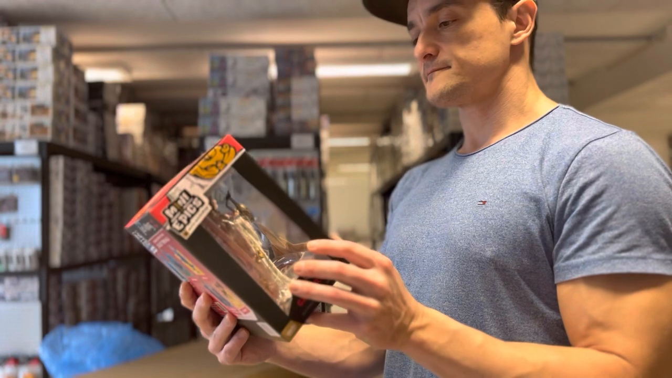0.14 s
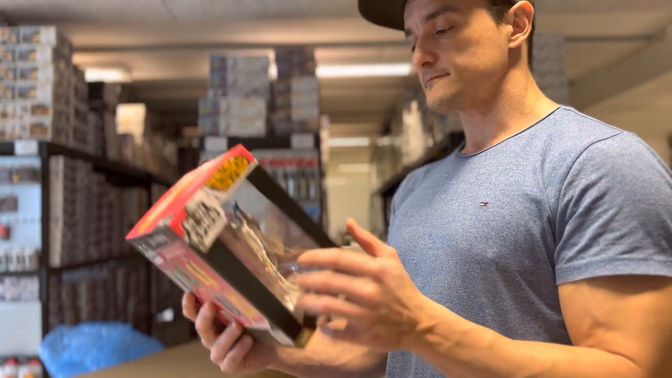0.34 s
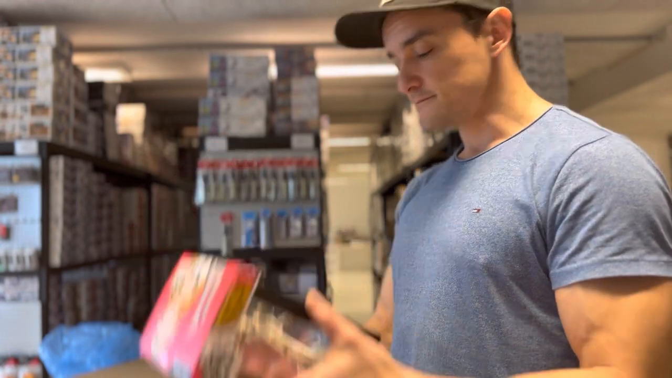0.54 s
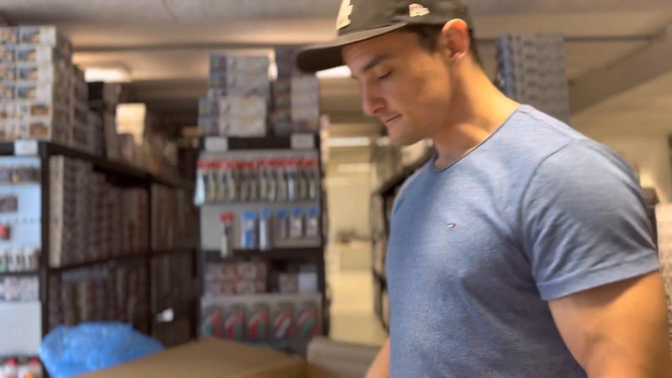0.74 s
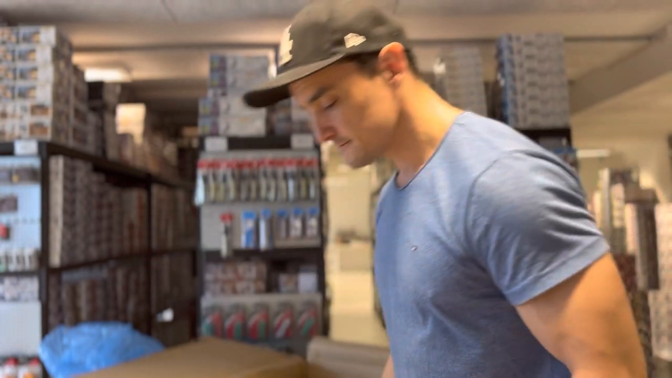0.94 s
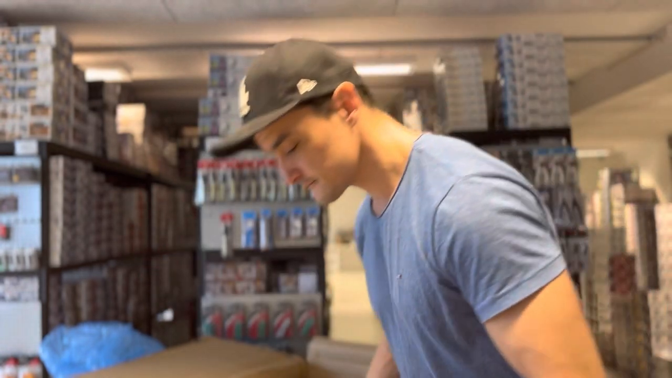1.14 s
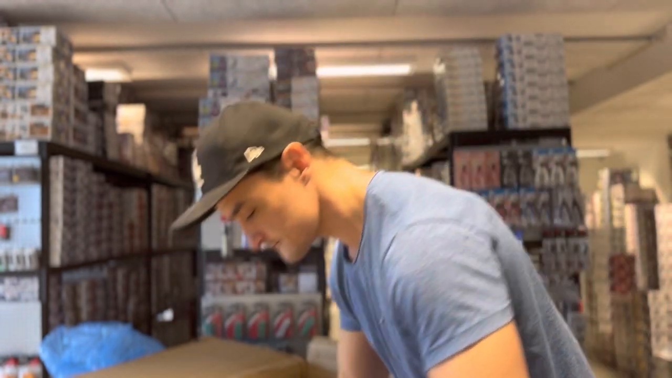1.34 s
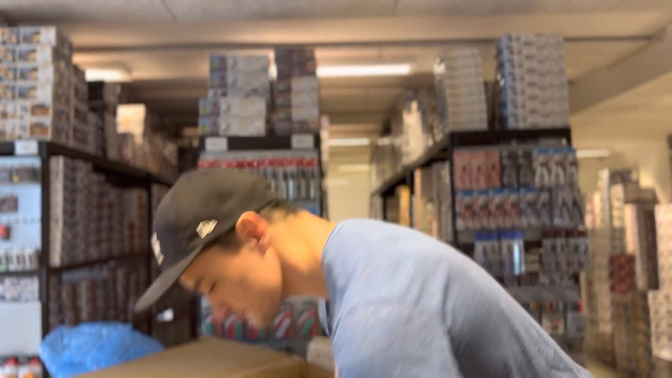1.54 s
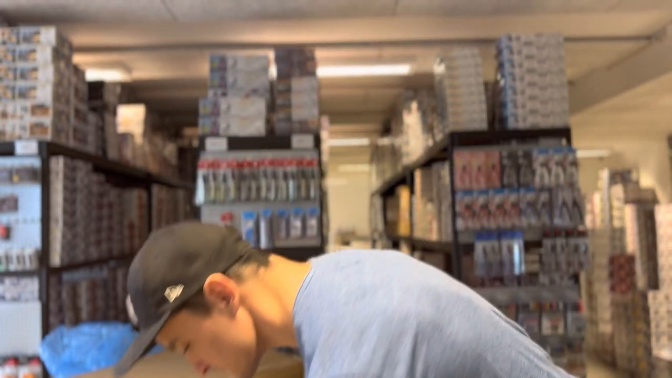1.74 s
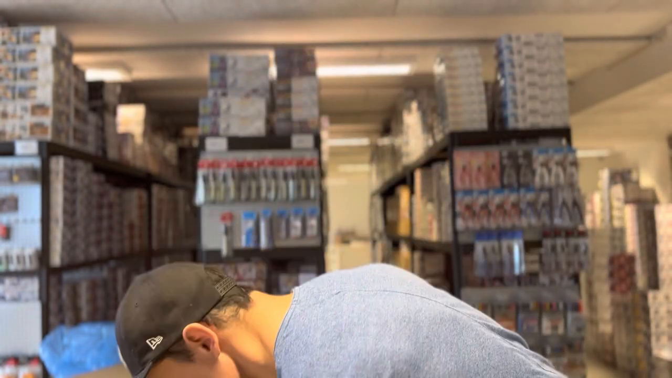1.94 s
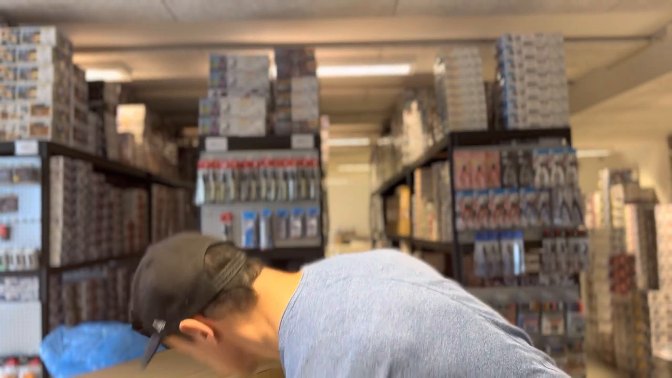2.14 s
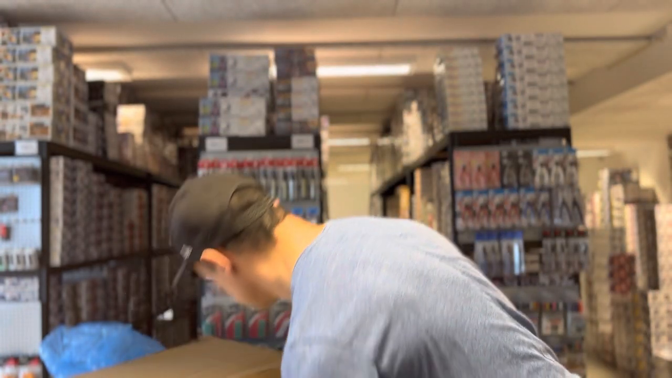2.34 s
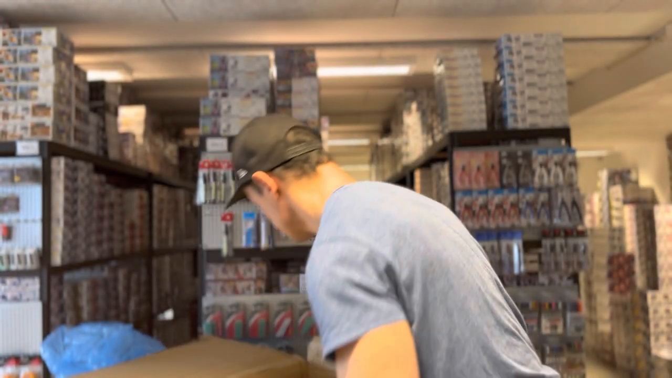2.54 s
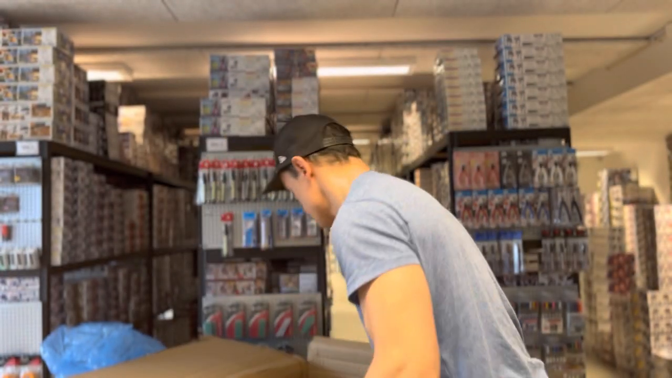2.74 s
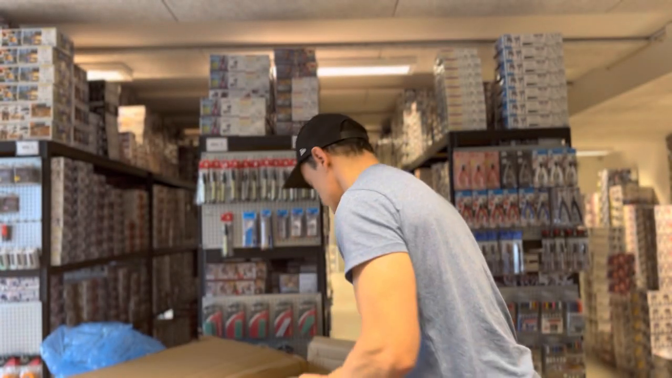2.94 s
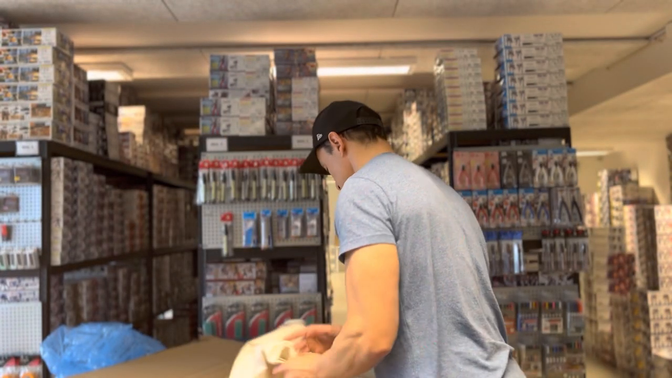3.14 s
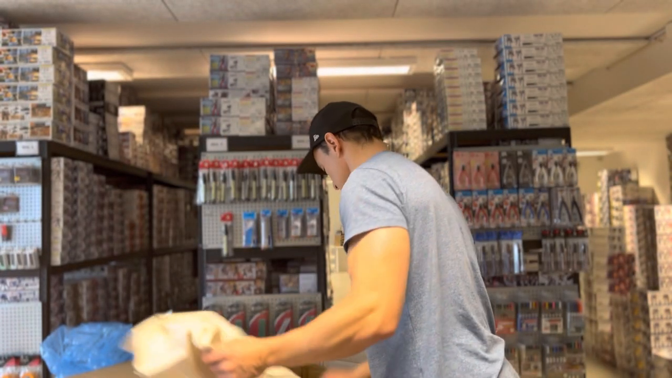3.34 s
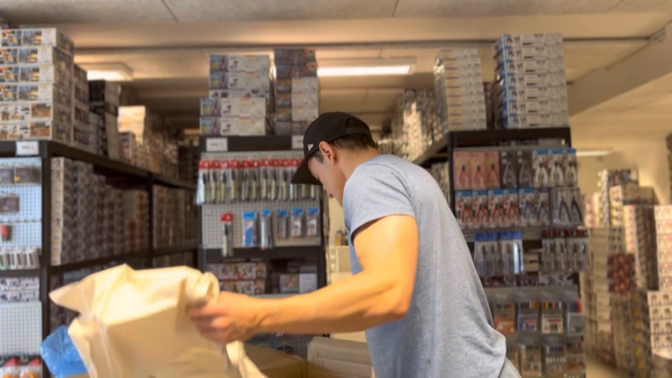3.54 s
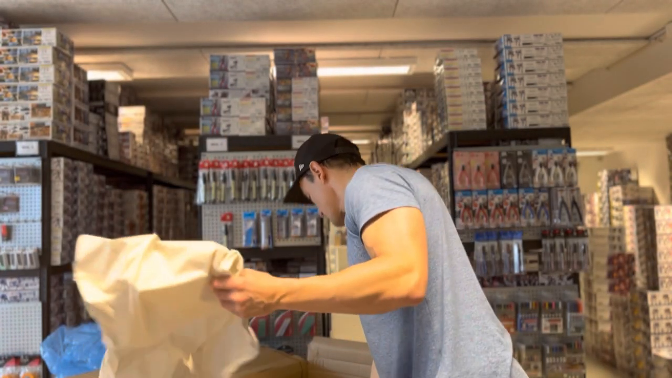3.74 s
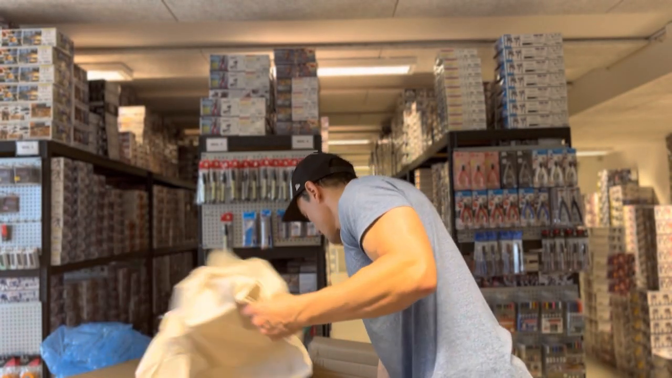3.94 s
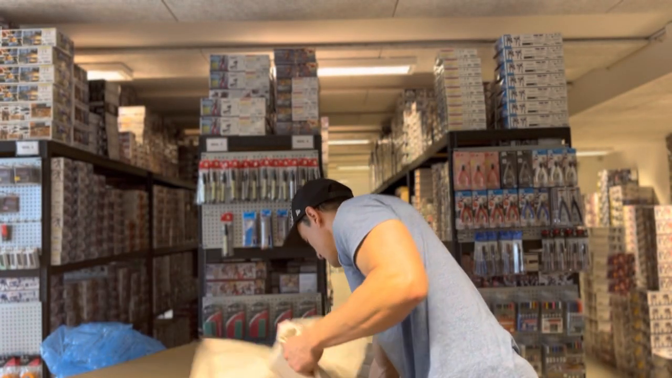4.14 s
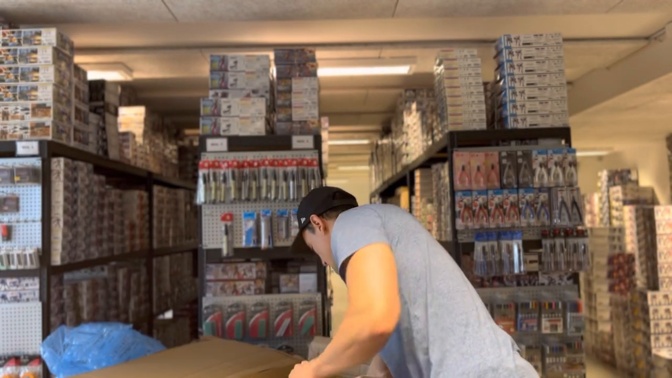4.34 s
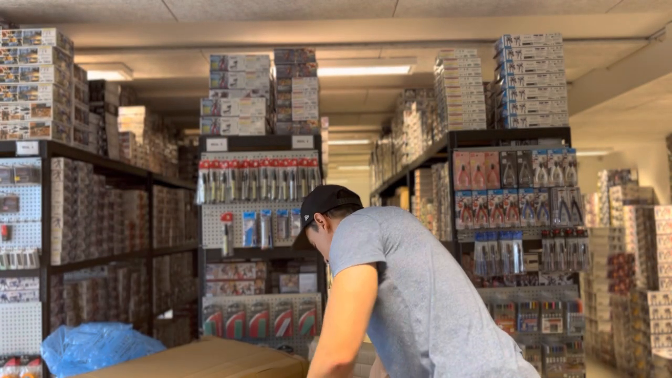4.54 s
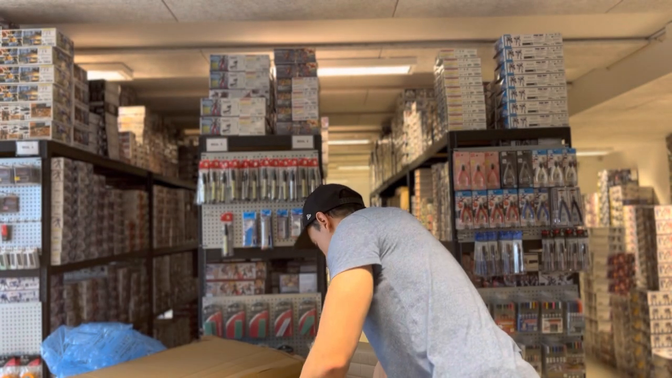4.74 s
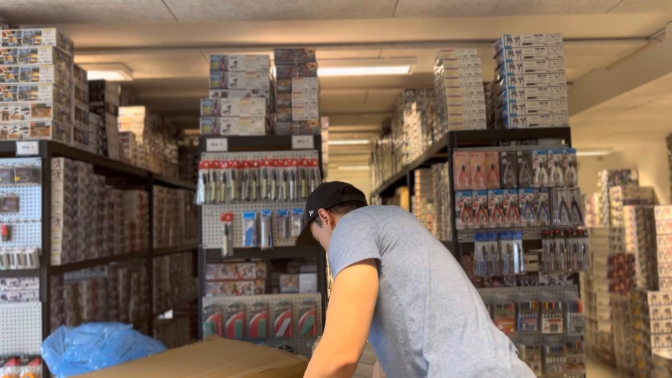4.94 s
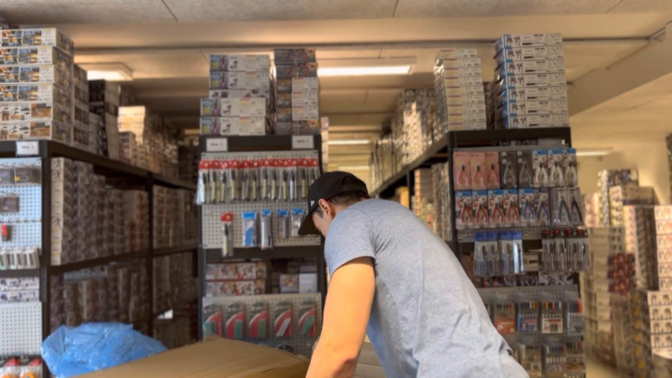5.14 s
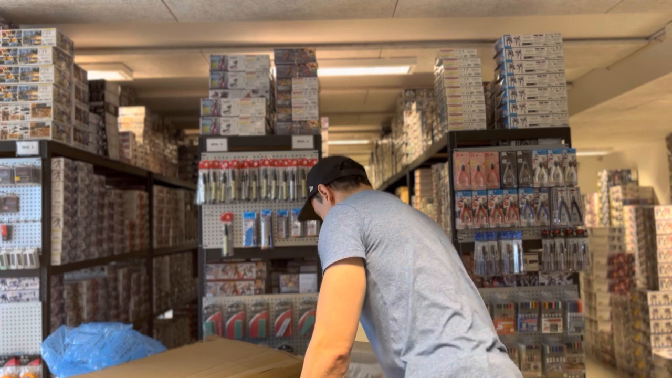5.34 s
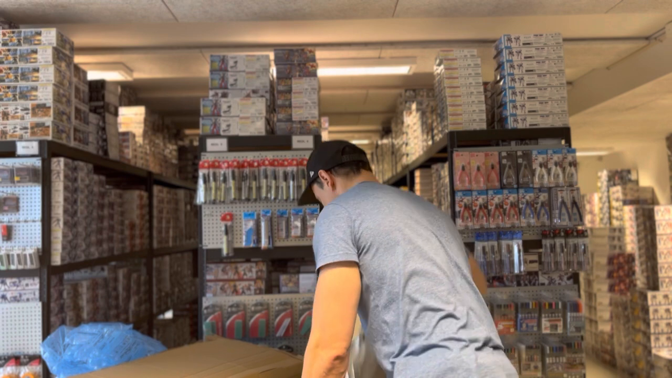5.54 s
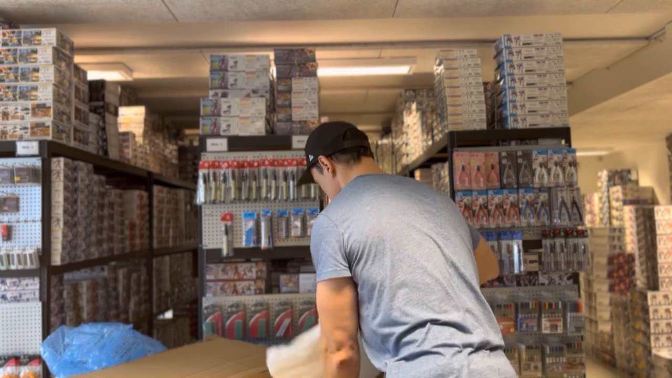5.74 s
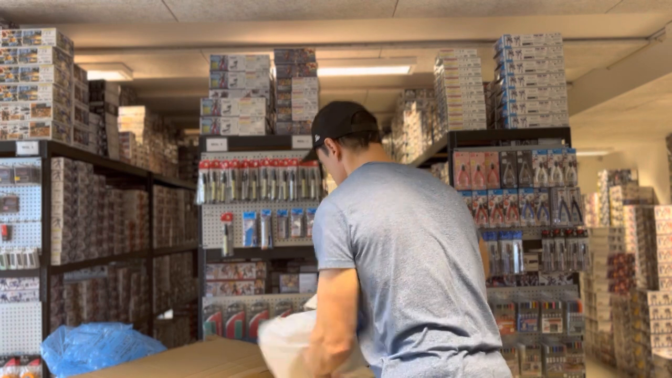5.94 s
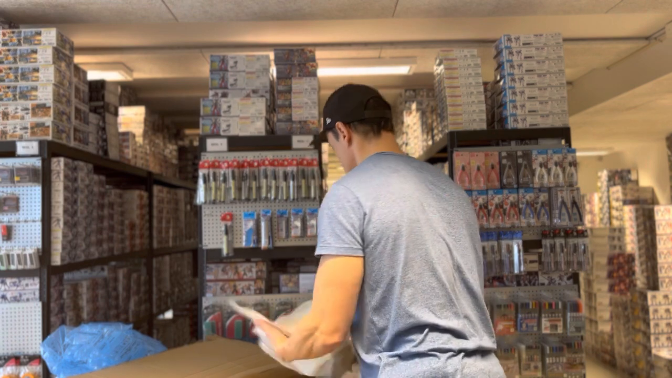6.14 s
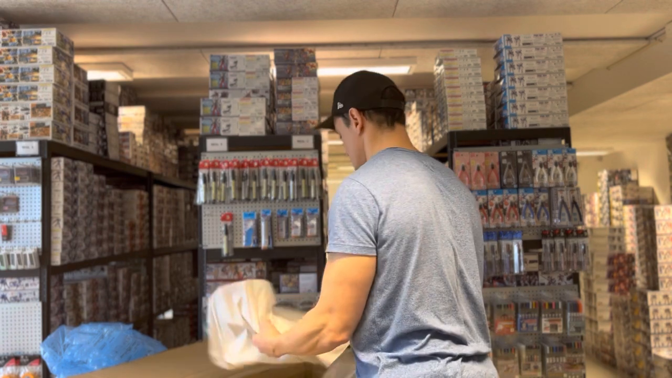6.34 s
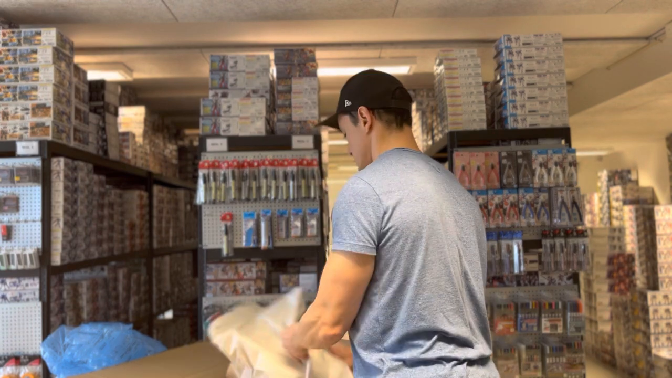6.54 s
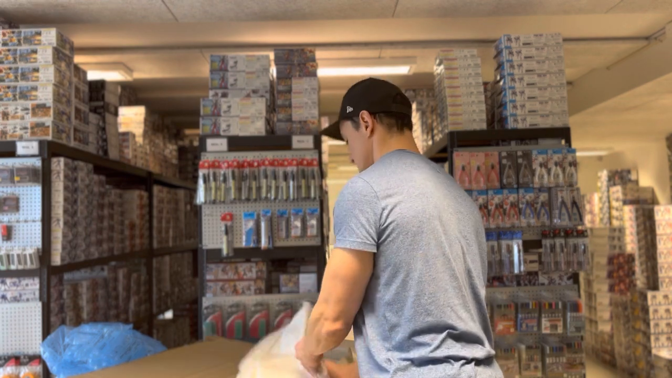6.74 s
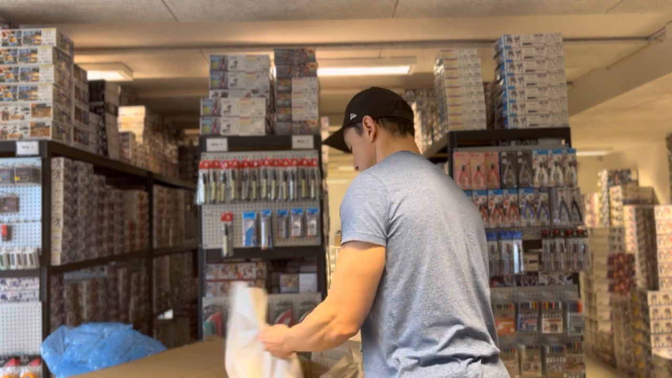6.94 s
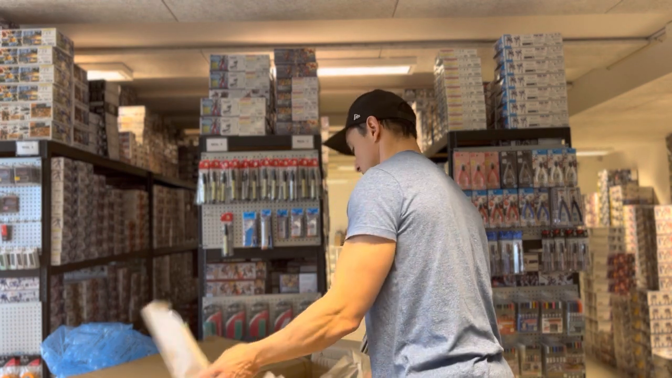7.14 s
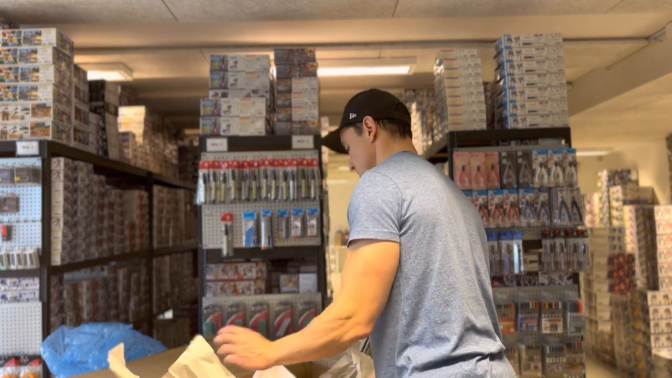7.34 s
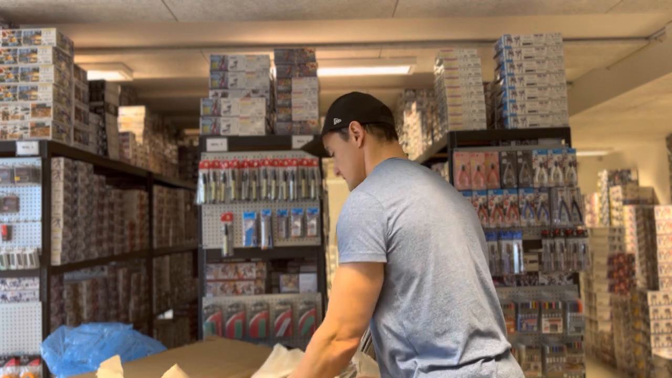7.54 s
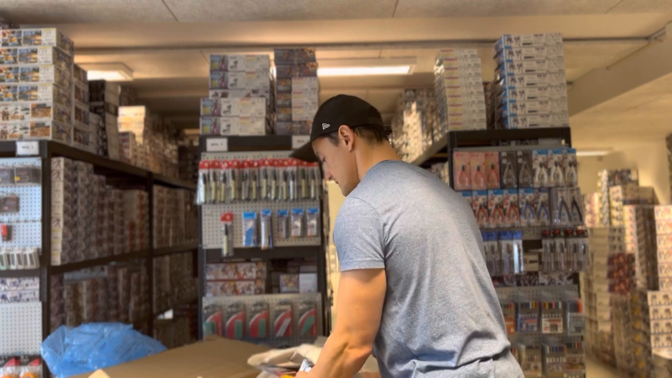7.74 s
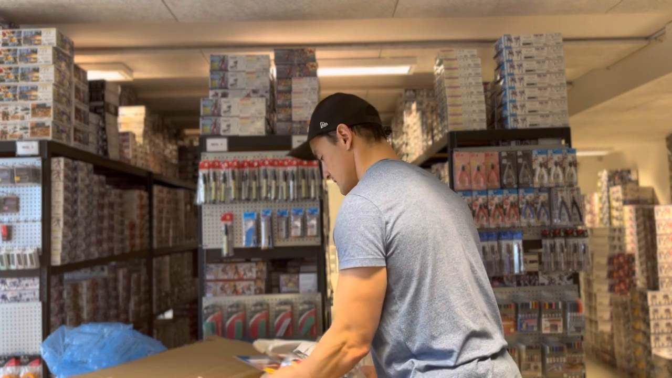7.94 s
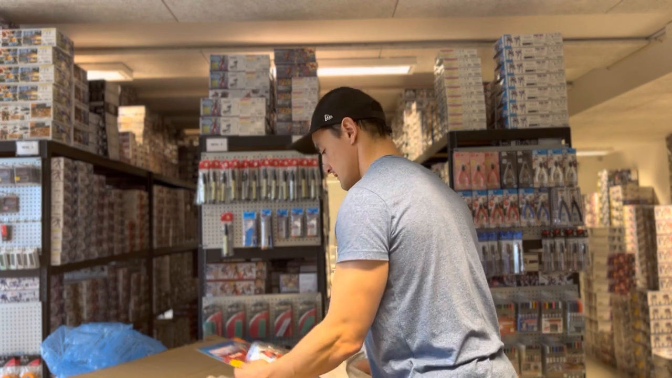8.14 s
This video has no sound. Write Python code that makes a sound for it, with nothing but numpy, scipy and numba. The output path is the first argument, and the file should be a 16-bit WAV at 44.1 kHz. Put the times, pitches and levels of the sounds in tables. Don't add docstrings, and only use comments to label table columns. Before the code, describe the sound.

A close stereo pickup in a stockroom, with very faint low room tone and short soft reflections from shelves. From 0.3 to 0.7 s a light carton is gripped and shifted: dull knocks, tiny card ticks and a small hollow thump. A fainter bump comes near 1.1 s, then low hollow thuds as it is set down around 1.8 to 2.1 s, and near quiet. At 2.7 s packing paper starts to rustle; a sharp loud crackle bursts at 3.07 s, followed by uneven dense crinkling, with strong snaps around 4.0 to 4.6 s. It eases, with box bumps near 5.1 s. From 5.6 s a second wad crumples harder, bright snaps at 5.9 s, the strongest crunch and deep box boom at about 6.6 s. Crisp crackles continue around 7.1 s, thinning to small clicks and light rustles by 8.3 s.

```python
import sys
import numpy as np
from scipy import signal
from scipy.fft import rfft, irfft
from scipy.io import wavfile
from scipy.ndimage import uniform_filter1d
from numba import njit

SR = 44100
rng = np.random.default_rng(int(sys.argv[2]) if len(sys.argv) > 2 else 0)


def amp(db):
    return 10 ** (np.asarray(db, float) / 20)


def write(x):
    x = np.atleast_2d(x).T
    wavfile.write(sys.argv[1], SR, np.round(np.clip(x, -1, 1) * 32767).astype(np.int16))


N = 365148

# (time [s], peak [dB], ring pitch [Hz])
CARD_TICKS = [(0.485, -54, 3600), (0.524, -59, 2200), (0.5791, -55, 2720), (0.725, -52, 2870),
              (1.128, -60, 6400), (1.13, -66, 5100), (1.1373, -56, 2460), (1.281, -54.5, 2770),
              (1.9874, -55, 1540), (2.024, -55, 1810), (2.096, -50, 1760), (2.5875, -68.5, 3570)]
# (time [s], peak [dB], ring pitch [Hz])
FIRST_SNAPS = [(2.718, -42, 1850), (2.7616, -37, 3500), (2.9952, -36.5, 4230), (3.0445, -40, 4420),
               (3.0678, -23.5, 3350), (3.165, -39, 1910), (3.312, -56, 2440), (3.324, -39, 1470),
               (3.329, -62, 5160), (3.3708, -61, 3800), (3.3994, -39.5, 1720), (3.446, -47, 4100),
               (3.528, -39.5, 2130), (3.6047, -34.5, 1780), (3.675, -35, 5270), (3.688, -36, 5360),
               (3.745, -40, 3850), (3.8133, -36, 3700), (3.88, -31, 3440), (3.9406, -41, 3700),
               (3.9967, -34.5, 2330), (4.01, -40, 2000), (4.0947, -42, 3870), (4.16, -37, 2900),
               (4.2673, -25, 4200), (4.3425, -38, 2640), (4.414, -31, 3350), (4.436, -33, 4370),
               (4.518, -31.5, 4440), (4.5377, -30, 4100), (4.6619, -59, 1810), (4.808, -32, 3100),
               (4.9436, -33, 2960)]
# (time [s], peak [dB], ring pitch [Hz])
SECOND_SNAPS = [(5.608, -36, 1960), (5.7197, -36, 2130), (5.8275, -39, 3600), (5.9224, -24, 4030),
                (5.937, -30, 3300), (5.989, -29, 4100), (6.0862, -36, 3960), (6.216, -31.5, 4450),
                (6.317, -31.5, 1890), (6.4029, -55, 5150), (6.4436, -40.5, 4240), (6.4962, -28.5, 2660),
                (6.589, -24, 2210), (6.619, -24.5, 4750), (6.715, -35, 4960), (6.791, -27, 4080),
                (6.925, -50, 4420), (7.0674, -49, 4470), (7.085, -29, 3430), (7.211, -38, 5700),
                (7.2937, -41.5, 2900), (7.3503, -60, 4130), (7.5145, -41, 2350), (7.558, -46, 5000),
                (7.593, -38, 1550), (7.6406, -45, 2980), (7.71, -39, 5160), (7.806, -41.5, 1730),
                (7.834, -43, 2260), (7.893, -49, 4330), (7.912, -35.5, 3400), (8.134, -49, 2000),
                (8.1814, -35.5, 4600)]
# (time [s], peak [dB], ring pitch [Hz])
CARTON_KNOCKS = [(0.307, -54.5, 336), (0.464, -52, 355), (0.489, -40.5, 1230), (0.522, -32.5, 764),
                 (0.523, -36.5, 1240), (0.524, -39, 332), (0.538, -37.5, 430), (0.681, -47, 371),
                 (0.734, -58, 440), (0.993, -62, 2310), (1.006, -61.5, 2270), (1.137, -42, 2500),
                 (1.12, -51.5, 1170), (1.138, -45.5, 910), (1.2, -48.5, 466), (1.706, -57.5, 320),
                 (1.746, -56, 470), (1.812, -38, 382), (1.814, -47, 884), (1.898, -47, 430),
                 (1.949, -55, 458), (1.989, -41, 291), (2.029, -46, 320), (2.096, -42, 903),
                 (2.118, -52, 1320), (2.024, -55, 1750), (2.129, -48.5, 310), (2.532, -56, 326)]
# (time [s], peak [dB], ring pitch [Hz])
BOX_KNOCKS = [(2.718, -59, 1120), (3.017, -39, 760), (3.072, -50, 1264), (4.414, -44, 386),
              (5.082, -43, 454), (5.125, -43, 900), (5.19, -43, 650), (5.718, -38, 1300), (5.825, -44, 397),
              (6.213, -40, 502), (6.433, -35, 1190), (6.648, -52.5, 310), (6.793, -43.5, 377),
              (7.21, -40, 1190), (7.912, -41, 1180), (8.134, -46, 1210)]
# (time [s], peak [dB], ring pitch [Hz])
BOOMS = [(0.49, -36.5, 118), (0.58, -49, 79), (0.682, -41.5, 132), (0.695, -47, 77), (1.252, -55, 85),
         (1.98, -42, 78), (2.54, -53, 71), (1.75, -39, 149), (1.82, -34, 194), (1.958, -39.5, 152),
         (1.984, -38, 185), (2.12, -41, 154), (2.53, -51, 262), (2.759, -42, 205), (2.964, -38, 249),
         (3.072, -29, 210), (3.263, -35, 148), (3.294, -47, 163), (3.324, -44, 147), (3.87, -42, 169),
         (4.473, -48, 220), (4.658, -40, 157), (4.739, -39, 146), (4.765, -36, 148), (5.081, -35, 147),
         (5.105, -31, 203), (5.632, -42, 237), (5.721, -30, 205), (5.7204, -29.5, 155), (5.741, -29, 151),
         (5.828, -30, 205), (5.8415, -31, 205), (6.6498, -21, 205), (6.6589, -24, 140.5),
         (6.6722, -28, 139.4), (6.6726, -25, 205)]
# (pitch [Hz], level [dB per Hz])
PAPER_COLOUR = [(1250, -1.5), (1600, -5.5), (2500, -2.5), (4000, -1.5), (5500, -13), (7500, -1),
                (10000, -7), (13000, -10.5), (16000, -26)]
# (pitch [Hz], time to fade by 60 dB [s], level [dB])
BOX_TONES = [(58, 0.094, -2), (86.5, 0.1, -4), (118, 0.062, -17), (148.3, 0.092, -1), (205, 0.2, -3),
             (237, 0.08, -4), (336, 0.014, -1)]
# (pitch [Hz], lead [radians])
PORT_LEAD = [(0, 0), (1980, .1), (2930, 1), (4820, .6), (5680, -.6), (6630, -1), (7700, -3), (8900, -3.2),
             (9900, -4.6), (11100, -6.2), (13500, -6.4), (14300, -9.3), (16000, -9.4)]
# (pitch [Hz], left minus right [dB])
PORT_BALANCE = [(60, 2), (110, 0.5), (380, 0), (700, 3), (2380, 0), (4400, 6.5), (8120, 0), (15000, 1)]
# (pitch [Hz], time to fade by 60 dB [s], level [dB])
SHELF_TAIL = [(98, 0.51, -11.5), (473, 0.16, -5), (2000, 0.23, -6.5), (5700, 0.13, -11), (13400, 0.05, -50)]
# (pitch [Hz], level [dB per Hz])
AIR_COLOUR = [(18, -32), (30, 12.5), (60, 4), (428, -16.5), (798, -21.5), (2360, -31.5), (7500, -46),
              (16500, -120)]
# (0 sum or 1 difference, low [Hz], high [Hz], edge
# flutter [Hz])
SILENT_BANDS = [(0, 7700, 9250, 330), (1, 10900, 13200, 400), (0, 14100, 17500, 800),
                (1, 14300, 14100, 900)]
# (time [s], length [s])
WHOLE_MOMENTS = [(2.735, .05), (3.045, .008), (3.068, .008), (3.315, .045), (3.41, .04), (3.55, .05),
                 (3.606, .025), (3.815, .025), (4.25, .015), (4.412, .012), (6.714, .008), (6.935, .04),
                 (6.985, .012), (7.085, .018), (7.345, .022), (7.555, .03), (7.712, .008), (7.735, .012),
                 (7.845, .055), (7.905, .03), (8.15, .05)]
# (time [s], level above 6 kHz [dB])
STIFFNESS = [
    (0.5, 3),
    (1.3, -2.5),
    (1.36, 4),
    (1.6, 9),
    (1.9, -2.5),
    (2.8, -8.5),
    (6.0, -10),
    (8.28, -7),
]
# (start [s], hold [s], wall [dB], finger crackle [dB], release [dB per s])
GRIPS = [(0.304, 0.037, -60.5, -65, 704), (0.269, 0.02, -85, -70, 300), (0.477, 0.11, -53, -66, 398),
         (0.562, 0.29, -84, -66, 253), (0.679, 0.013, -55.5, -70, 71), (0.956, 0.047, -95, -80, 300),
         (1.342, 0.03, -85, -81, 400), (2.33, 0.03, -83, -77, 300), (1.119, 0.015, -71, -61, 250),
         (1.185, 0.1, -62, -67.5, 107), (1.26, 0.062, -74, -69.5, 230), (1.752, 0.13, -50.5, -76.5, 148),
         (1.924, 0.11, -48.5, -67.5, 148), (2.08, 0.11, -61, -70.5, 115), (2.285, 0.041, -74, -72, 250),
         (2.53, 0.026, -61.5, -79, 400)]
# (time [s], crumpling effort [dB], weight on the box [dB])
RUMMAGE = [(2.705, -100, -100), (2.72, -47, -55.5), (3.04, -43, -57), (3.37, -52.5, -64.5),
           (3.95, -39.5, -49.5), (4.22, -55, -49.5), (4.665, -43.5, -47.5), (4.675, -48, -50),
           (5.2, -43.5, -49), (5.8, -41.5, -52.5), (6.3, -40.5, -49), (6.41, -49, -51.5), (6.9, -47, -60),
           (7.44, -55, -61), (7.55, -46.5, -57.5), (8.0, -48.5, -57), (8.11, -56, -67), (8.28, -64, -58.5)]
# (time [s], peak [dB], 20 dB rise [s], 20 dB fall [s])
TUGS = [(2.765, -34, 0.033, 0.37), (3.071, -26.5, 0.0035, 0.19), (3.17, -39, 0.03, 0.26),
        (3.46, -39, 0.035, 0.16), (4.005, -33, 0.043, 0.23), (4.277, -47, 0.09, 0.18),
        (4.44, -36.5, 0.46, 0.084), (4.55, -35, 0.17, 0.26), (4.96, -45.5, 0.044, 0.92),
        (5.94, -29.5, 0.037, 0.031), (6.012, -34, 0.033, 0.036), (5.996, -33.5, 0.067, 0.054),
        (6.14, -33, 0.098, 0.046), (6.52, -52, 0.15, 0.2), (6.634, -26, 0.16, 0.13),
        (6.815, -33.5, 0.56, 0.07), (7.1, -33.5, 0.069, 0.18), (7.22, -35, 0.11, 0.14),
        (8.14, -47.5, 0.02, 0.89)]
# (time [s], peak [dB], 20 dB rise [s], 20 dB fall [s])
SHOVES = [(2.76, -52.5, 0.057, 0.51), (3.08, -47.5, 0.042, 0.89), (3.25, -57, 0.2, 0.082),
          (5.09, -46, 0.033, 0.15), (5.72, -51, 0.032, 0.34), (5.92, -56, 0.03, 0.64),
          (6.6, -48.5, 0.25, 0.09), (6.67, -31, 0.029, 0.016), (6.79, -43, 0.04, 0.083),
          (7.2, -52, 0.25, 0.32), (8.14, -51.5, 0.023, 0.11)]
# (time [s], peak [dB], level of the duller body [dB])
FIRST_CLICKS = [(2.7202, -33, -48), (2.7613, -37, -39), (2.7948, -52, -31), (2.8655, -48, -42),
                (2.907, -40, -41), (2.9304, -36, -36), (2.9528, -32, -47), (3.0107, -45, -43),
                (3.0157, -43, -48), (3.045, -29, -41), (3.0686, -14, -32), (3.1015, -28, -42),
                (3.161, -34, -30), (3.167, -22.5, -33), (3.213, -29, -37), (3.2314, -24.5, -37),
                (3.313, -34, -42), (3.408, -35, -41), (3.414, -38, -49), (3.4486, -33, -47),
                (3.4663, -34, -55), (3.4957, -31.5, -47), (3.547, -30.5, -45), (3.6098, -43, -50),
                (3.61, -31, -50), (3.676, -32, -45), (3.747, -28.5, -41), (3.7894, -46, -53),
                (3.8132, -25, -51), (3.8796, -31, -43), (3.9417, -29, -38), (3.995, -36, -34),
                (4.0107, -25, -29), (4.0883, -27, -50), (4.1177, -43, -41), (4.163, -37, -44),
                (4.253, -39, -49), (4.2677, -43, -34.5), (4.373, -37, -42), (4.41, -22, -33.5),
                (4.435, -28, -47), (4.4948, -34, -47), (4.5178, -37, -45), (4.5228, -33, -43),
                (4.5367, -28, -34), (4.6087, -33, -37), (4.629, -30, -44), (4.663, -29, -43),
                (4.8075, -35, -41), (4.9448, -48, -39), (4.95, -40, -40), (5.11, -37, -40.5)]
# (time [s], peak [dB], level of the duller body [dB])
SECOND_CLICKS = [(5.6145, -30.5, -42), (5.8347, -49, -34.5), (5.926, -35, -30), (5.987, -37, -29.5),
                 (6.0837, -39.5, -47), (6.087, -24, -44), (6.2147, -30, -32.5), (6.3096, -32, -48),
                 (6.351, -35, -37), (6.384, -43, -42), (6.403, -41, -38), (6.4245, -44, -50),
                 (6.4444, -31, -37.5), (6.496, -25, -44), (6.553, -43, -31), (6.561, -46, -33),
                 (6.5893, -35, -31), (6.621, -18, -34), (6.7143, -26, -47), (6.7303, -28, -42),
                 (6.7863, -21, -45), (6.9253, -50, -55), (6.9328, -46, -55), (6.947, -34, -43.5),
                 (6.983, -39, -49), (7.0154, -39, -45), (7.0401, -50, -57), (7.053, -41, -46),
                 (7.066, -36, -40), (7.0857, -22, -50), (7.0897, -20.5, -46), (7.135, -33, -42),
                 (7.159, -27, -36), (7.212, -42, -46), (7.2162, -39, -49), (7.294, -44, -41),
                 (7.3512, -35, -48), (7.4496, -59, -59), (7.498, -42, -57), (7.512, -35, -57),
                 (7.5607, -36, -37), (7.5917, -46, -46), (7.614, -41, -39.5), (7.6407, -48, -47),
                 (7.682, -36, -42), (7.7126, -28, -46), (7.733, -31, -52), (7.766, -37, -42.5),
                 (7.808, -32, -48), (7.834, -31, -39), (7.8938, -32.5, -48), (7.9697, -37, -50),
                 (8.031, -41, -50), (8.066, -46, -46), (8.1346, -45, -47), (8.1352, -39, -46),
                 (8.164, -36, -48), (8.182, -30, -57), (8.217, -35, -41)]

AIR_DB = -67.5
GRIP_ATTACK_DB_S = 1400
CARD_FLAP_SLOPE = 0.96
CARD_FLAP_DB, SHEET_FLAP_DB, TUG_FLAP_DB = -7.5, 2.5, -24
CARD_RUMBLE_DB, WEIGHT_RUMBLE_DB, SHOVE_RUMBLE_DB = 1.5, 2.5, 4.5
FAR_EDGES_DB, CRACK_DB, TICK_DB = -6.5, 1, -11
SNAP_RISE_S = 0.0007
POP_SHARE, POP_LOST_PER_DB, POP_SCATTER_DB, POP_FALL_S = 0.06, 0.006, 12.0, 0.0015
CLICK_RISE_S, CLICK_FALL_S, CLICK_DB = 0.0002, 0.0011, -7


def unit(x):
    return x / np.sqrt(np.mean(x ** 2))


def on_log(table, hz, column=1):
    rows = np.array(table, float)
    return np.interp(np.log(hz + 1), np.log(rows[:, 0] + 1), rows[:, column])


def in_time(table):
    seconds, *columns = np.array(table, float).T
    return [np.interp(np.arange(N) / SR, seconds, column) for column in columns]


def band(x, low_hz, high_hz):
    return signal.sosfilt(signal.butter(3, [low_hz, high_hz], "bandpass", fs=SR, output="sos"), x)


def part(x, low_hz, high_hz):
    octave = np.log2(np.fft.rfftfreq(N, 1 / SR) + 1)

    def below(hz):
        return np.clip((np.log2(hz) - octave) / 0.3 + 0.5, 0, 1)

    return irfft(rfft(x) * (below(high_hz) - below(low_hz)), N)


@njit
def rings(start, hz, t60, size):
    out = np.zeros(N)
    for k in range(len(start)):
        turn = np.exp(2j * np.pi * hz[k] / SR - np.log(1000) / (t60[k] * SR))
        z = size[k] + 0j
        for i in range(start[k], min(N, start[k] + int(t60[k] * SR) + 2)):
            out[i] += z.imag
            z *= turn
    return out


def grains(count, low_hz, high_hz, cycles, scatter_db, colour=None):
    when, pitch, big, sign, length = rng.random((count, 5)).T
    hz = low_hz * (high_hz / low_hz) ** pitch
    turns = cycles * 2 ** (3 * length - 1.5)
    size_db = np.minimum(-scatter_db * np.log(1 - big), 14)
    size = amp(size_db) * np.sign(sign - 0.5) * hz / np.sqrt(turns)
    if colour is not None:
        size = size * amp(on_log(colour, hz))
    return unit(rings((when * N).astype(np.int64), hz, turns / hz, size))


def bursts(events, rise_s, fall_s):
    power = np.zeros(N)
    np.add.at(power, (events[:, 0] * SR).astype(int), amp(2 * events[:, 1]))
    t = np.arange(SR // 4) / SR
    shape = np.exp(-t / fall_s) - np.exp(-t / min(rise_s, fall_s / 2))
    return np.maximum(signal.fftconvolve(power, shape / shape.max())[:N], 0)


def struck(events, t60, gain_db):
    start = (events[:, 0] * SR).astype(np.int64)
    return rings(start, 1.0 * events[:, 2], t60, amp(events[:, 1] + gain_db))


def shower(events, count, spread_s, octaves, cycles, gain_db):
    late, pitch, big = rng.random((3, len(events), count))
    late_s = -spread_s * np.log(1 - late)
    hz = np.clip(events[:, 2:3] * 2 ** (octaves * (2 * pitch - 1)), 50, 0.4 * SR)
    size = amp(events[:, 1:2] + gain_db) * (2 * big - 1)
    start = ((events[:, :1] + late_s) * SR).astype(np.int64)
    return rings(start.ravel(), hz.ravel(), cycles / hz.ravel(), size.ravel())


def blurred(x):
    tones = np.abs(rfft(x))
    return irfft(tones * np.exp(2j * np.pi * rng.random(len(tones))), N)


def power_db(*levels):
    return 10 * np.log10(sum(amp(2 * db) for db in levels))


def swells(rows, t):
    levels = []
    for peak_s, db, rise, fall in rows:
        away = np.maximum((peak_s - t) / abs(rise), (t - peak_s) / abs(fall))
        levels.append(db - 20 * np.clip(away, 0, 5))
    return power_db(*levels)


def air():
    hz = np.fft.rfftfreq(N, 1 / SR)
    mid, side = rfft(rng.standard_normal((2, N))) * amp(on_log(AIR_COLOUR, hz))
    apart = np.minimum(hz / 700, 1)
    return amp(AIR_DB) * unit(irfft(mid + apart * side * np.array([[1], [-1]]), N))


def hands():
    t = np.arange(0, N, 32) / SR
    walls, fingers = [], []
    for start, hold, wall_db, finger_db, release in GRIPS:
        off_db = np.maximum((start - t) * GRIP_ATTACK_DB_S, (t - start - hold) * release)
        shape = -np.clip(off_db, 0, 100)
        walls.append(wall_db + shape)
        fingers.append(finger_db + shape)
    card = power_db(*walls)
    effort, weight = np.array(in_time(RUMMAGE))[:, ::32]
    tug, shove = swells(TUGS, t), swells(SHOVES, t)
    push = power_db(weight, shove)

    crackle = power_db(power_db(*fingers), effort, tug)
    card_flap = CARD_FLAP_SLOPE * (card + 45) - 45 + CARD_FLAP_DB
    flap = power_db(card_flap, push + SHEET_FLAP_DB, tug + TUG_FLAP_DB)
    wall = power_db(card, push)
    rumble = power_db(card + CARD_RUMBLE_DB, weight + WEIGHT_RUMBLE_DB, shove + SHOVE_RUMBLE_DB)
    return in_time(np.transpose([t, crackle, flap, wall, rumble]))


def panels(flap_db, wall_db):
    knocks = np.concatenate([CARTON_KNOCKS, BOX_KNOCKS])
    rattle = shower(knocks, count=14, spread_s=0.007, octaves=0.36, cycles=17.0, gain_db=-5.5)
    flaps = grains(count=7000, low_hz=533, high_hz=1750, cycles=9.2, scatter_db=3.0,
                   colour=[(600, -1), (1000, -3), (1700, -12.5)])
    walls = grains(count=4000, low_hz=290, high_hz=606, cycles=13.3, scatter_db=3.5,
                   colour=[(270, -2.0), (650, -7.5)])
    blows = band(struck(knocks, 46.0 / knocks[:, 2], -1.4) + rattle, 118, 3400)
    flapping = amp(flap_db - 5.0) * band(flaps, 420, 2170)
    return flapping + amp(wall_db - 5.0) * band(walls, 161, 760) + blows


def crease_texture():
    creases = paper_creases()
    when, pitch, big = rng.random((3, 2200))
    small = np.transpose([when * N / SR, 1.4 * big + 14.0 * pitch, 1200 * 8 ** pitch])
    patches = unit(shower(small, count=12, spread_s=0.007, octaves=0.24, cycles=55.0, gain_db=0))
    return (creases + blurred(creases)) / np.sqrt(2) + amp(-5.5) * patches


def paper_creases():
    return grains(count=60000, low_hz=1013, high_hz=16950, cycles=12.5, scatter_db=0.5, colour=PAPER_COLOUR)


def stick_and_slip(crackle_db):
    when, big = rng.random((2, 400))
    pops = bursts(np.transpose([when * N / SR, POP_SCATTER_DB * big ** 2]), SNAP_RISE_S, POP_FALL_S)
    share = np.clip(POP_SHARE - POP_LOST_PER_DB * (crackle_db + 45), 0, 0.2)
    steps = np.repeat(rng.standard_normal(N // 900 + 1), 900)[:N]
    slips = uniform_filter1d(steps, size=200)
    return (1 - share + share * pops / pops.mean()) * amp(3.5 * slips - 1.5)


def paper(crackle_db):
    snaps = np.concatenate([CARD_TICKS, FIRST_SNAPS, SECOND_SNAPS])
    texture, far_edge = crease_texture(), paper_creases()
    crumpling = stick_and_slip(crackle_db) * amp(2 * crackle_db - 4.0)
    stiff = amp(in_time(STIFFNESS)[0] + 0.46 * np.clip(crackle_db + 57.5, -12, 12))
    sheet, edges = 0, 0
    for low, high in [(100, 2200), (2200, 3600), (3600, 6000), (6000, 30000)]:
        octaves_off = np.abs(np.log2(snaps[:, 2] / np.sqrt(max(low, 1200) * min(high, 7000))))
        shaken = bursts(np.transpose([snaps[:, 0], snaps[:, 1] - 3.2 * octaves_off]), SNAP_RISE_S, 0.016)
        drive = np.sqrt(crumpling + amp(-11.5) * shaken)
        if low > 5000:
            drive = drive * stiff
        sheet = sheet + drive * part(texture, low, high)
        edges = edges + drive * part(np.array([far_edge, far_edge[::-1]]), low, high)

    crack = struck(snaps, 1.8 / snaps[:, 2], CRACK_DB)
    ring = struck(snaps, 120.0 / snaps[:, 2], -6.5)
    tick = struck(snaps * [1, 1, 0] + [0, 0, 10500], np.full(len(snaps), 0.00056), TICK_DB)
    neighbours = shower(snaps, count=24, spread_s=0.0089, octaves=0.18, cycles=28.0, gain_db=-17.0)
    return sheet + tick + crack + ring + neighbours, amp(FAR_EDGES_DB) * edges


def box(rumble_db):
    booms = np.array(BOOMS)
    when, big = rng.random((2500, 2)).T
    shoves = np.sign(big - 0.5) * amp(-2.5 * np.log(1 - np.abs(2 * big - 1) + 1e-9))
    start = (when * N).astype(np.int64)
    hollow = 0
    for hz, t60, db in BOX_TONES:
        hollow = hollow + rings(start, hz + 0 * big, t60 + 0 * big, amp(db) * shoves)
    hollow = unit(hollow)
    rumble = amp(rumble_db - 3) * hollow
    stirred = np.sqrt(amp(-13.0) * bursts(booms, 0.0011, 0.011)) * np.roll(band(hollow, 108, 760), SR)
    boom = uniform_filter1d(struck(booms, 22.0 / booms[:, 2], -1.2), size=110)
    return rumble + stirred + band(boom, 50, 1500)


def clicks():
    rows = np.concatenate([FIRST_CLICKS, SECOND_CLICKS])
    bright = unit(band(rng.standard_normal(N), 3200, 11000))
    dull = unit(band(rng.standard_normal(N), 1500, 5200))
    spit = bright * np.sqrt(bursts(rows[:, :2], CLICK_RISE_S, CLICK_FALL_S))
    body = dull * np.sqrt(bursts(rows[:, ::2], CLICK_RISE_S, 1.26 * CLICK_FALL_S))
    return amp(CLICK_DB) * spit + body


def shelves(x, alike_hz=450, delay_s=0.00018):
    t, tail = np.arange(SR // 2) / SR, 0
    for hz in 60 * 2.0 ** np.arange(9):
        edges_hz = [hz / 2 ** 0.5, min(hz * 2 ** 0.5, 0.49 * SR)]
        octave = signal.butter(2, edges_hz, "bandpass", fs=SR, output="sos")
        mid, side = signal.sosfilt(octave, rng.standard_normal((2, len(t))))
        apart = min(hz / alike_hz, 1)
        t60 = on_log(SHELF_TAIL, hz)
        fade = amp(-60 * t / t60 + on_log(SHELF_TAIL, hz, column=2))
        fade = fade * np.sqrt(np.log(1e6) / t60 / SR) * (1 - np.exp(-t / delay_s))
        tail = tail + fade * (mid + apart * side * np.array([[1], [-1]])) / np.sqrt(1 + apart ** 2)
    return signal.fftconvolve(x[None], tail, axes=1)[:, :N]


def ports(x):
    hz = np.fft.rfftfreq(N, 1 / SR)
    half = amp(on_log(PORT_BALANCE, hz) / 2) * np.exp(0.5j * on_log(PORT_LEAD, hz))
    return irfft(rfft(x) * np.array([half, 1 / half]), N)


def scene():
    crackle_db, flap_db, wall_db, rumble_db = hands()
    sheet, edges = paper(crackle_db)
    near = panels(flap_db, wall_db) + sheet + box(rumble_db) + clicks()
    turn = np.pi * np.arange(N) / SR / 0.9
    echoes = sum(shelves(near * np.cos(turn + np.pi * k / 3) ** 2) for k in range(3))
    return amp(-0.97) * ports(near) + edges + echoes + air()


def thin_out(x):
    hz, _, z = signal.stft(np.array([x[0] + x[1], x[0] - x[1]]) / 2, SR, nperseg=1024)
    t, whole = np.arange(z.shape[2]) * 512 / SR, np.array(WHOLE_MOMENTS)
    thinned = ~(np.abs(t[:, None] - whole[:, 0]) < whole[:, 1] / 2 + 0.002).any(axis=1)
    for channel, low, high, flutter in SILENT_BANDS:
        jumps = rng.choice([-1, 1], (2, len(t) // 4 + 1))
        edge = flutter * np.repeat(jumps, 4, axis=1)[:, :len(t)]
        inside = (hz[:, None] > low + edge[0] / 2) & (hz[:, None] < high + edge[1])
        z[channel][inside & thinned] = 0
    mid, side = signal.istft(z, SR, nperseg=1024)[1][:, :N]
    return np.array([mid + side, mid - side])


def roll_off(x):
    return signal.sosfilt(signal.butter(12, 15710, fs=SR, output="sos"), x)


def record(dry):
    hiss = amp(-86.5) * band(band(rng.standard_normal((2, N)), 200, 13500), 100, 13500)
    no_deep_bass = signal.sosfilt(signal.butter(4, 62, "highpass", fs=SR, output="sos"), dry)
    return roll_off(thin_out(no_deep_bass) + hiss)


dry = scene()
out = record(dry)
write(out)
```